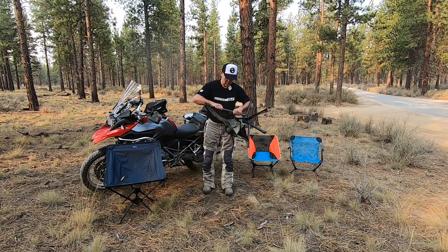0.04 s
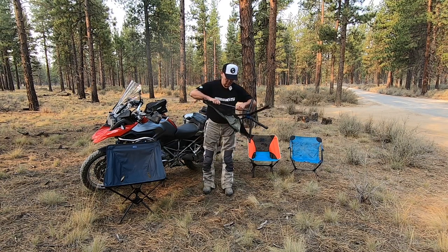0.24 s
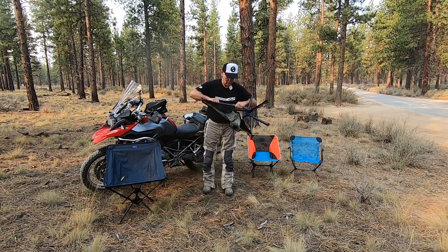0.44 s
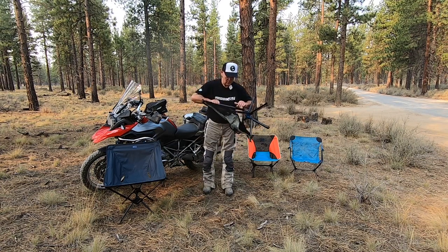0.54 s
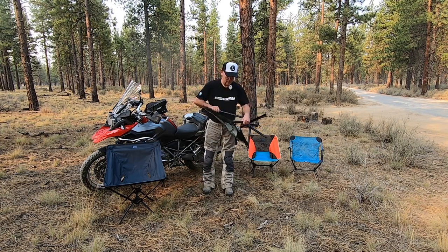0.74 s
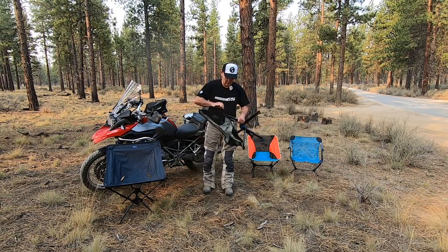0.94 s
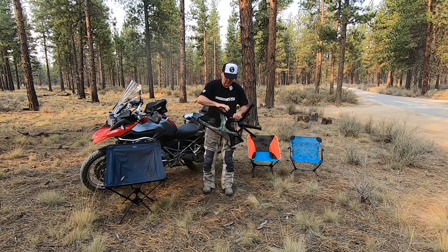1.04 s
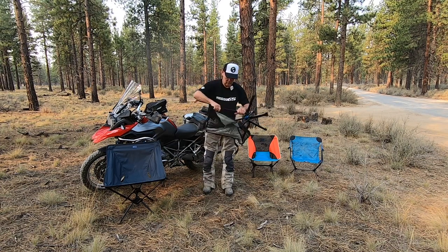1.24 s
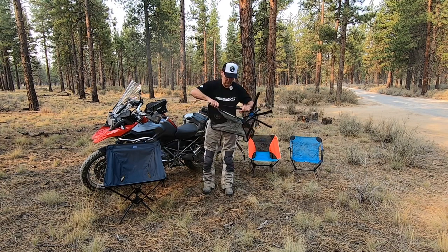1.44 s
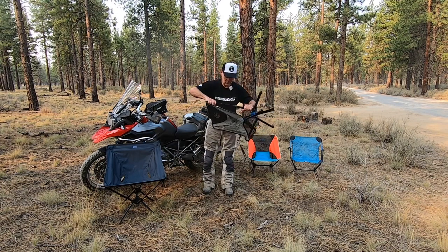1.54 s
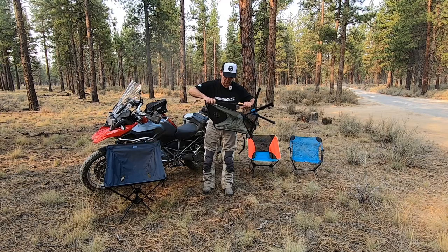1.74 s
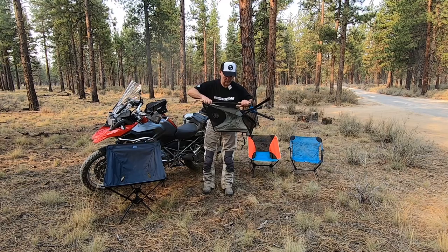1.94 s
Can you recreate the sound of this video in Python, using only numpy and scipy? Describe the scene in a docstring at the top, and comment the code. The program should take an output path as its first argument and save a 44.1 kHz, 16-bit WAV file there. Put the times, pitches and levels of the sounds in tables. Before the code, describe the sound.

Stiff camp chair fabric crackles and slides while frame poles click sharply into place in a quiet forest.

```python
"""In a nearly silent forest, a folding camp chair is opened by hand, close to the microphone.
Stiff nylon rustles and crackles as uneven slips over hiss; friction sounds a hollow sliding pole.
Small ticks and cloth-wrapped knocks are short bursts with rings; the corded poles snap into their hub
as cracks, decaying modes and a low push, hard enough to overload the recorder.
The sound is almost mono: a faint diffuse tail lies in the middle, a very faint signal at the sides."""
import sys
import numpy as np
from scipy import signal
from scipy.fft import rfft, irfft, next_fast_len
from scipy.io import wavfile
from scipy.ndimage import map_coordinates

SR = 44100
rng = np.random.default_rng(int(sys.argv[2]) if len(sys.argv) > 2 else 0)


def wrap_up_sound(samples):
    """Save the sound to the file named by the first command line argument, as 16-bit audio."""
    columns = np.atleast_2d(samples).T
    # keep every value between -1 and 1, then stretch to whole-number steps
    tamed = np.clip(columns, -1, 1)
    steps = np.round(tamed * 32767).astype(np.int16)
    wavfile.write(sys.argv[1], SR, steps)


N = 88200  # samples: two seconds
BLOW_LEN = SR // 4  # samples given to each blow

# spectrum of rubbed nylon: (frequency [Hz], level [dB])
NYLON_SPECTRUM = [(30, -14), (120, -1), (300, -5), (600, -1), (1100, 0), (1600, -4), (2400, -2),
                  (3100, -4.5), (4000, -3.5), (5500, -8), (8000, -13), (12000, -16), (16000, -20.5)]

# fine friction of cloth: slips [1/s], spread of their size [dB], their share of the power [0-1]
CREASES_PER_S, CREASE_SPREAD_DB, CREASE_SHARE = 2500, 3.5, 0.42
CRINKLE_SPREAD_DB = 3.5  # size spread of the sparser crinkles and catches
TREBLE_HZ = 5000  # treble lifts act above about here
ATTACK_S = 0.00013  # time constant of the rise of a blow
RING_PHASE_NOISE = 0.45  # unsteadiness of a ringing mode [rad]
SCATTER_DB, WIDTH_DB = -34.5, -48.5  # level of the faint diffuse tail in mid; of the very faint side signal
AIR_DB, AIR_WIDTH_DB = -50, -30.5  # rms of the air; its side relative to its mid
CLIP_TOP, TOP_HZ = 1.0, 16000  # overload ceiling [full scale = 1] and band limit


def amp(db):
    """Decibels to gain."""
    return 10 ** (np.asarray(db) / 20)


def unit(x):
    """Scale to rms 1."""
    return x / np.sqrt(np.mean(x ** 2) + 1e-20)


def along(points, hz):
    """Interpolate (frequency [Hz], value) points on a log frequency axis."""
    f, v = np.transpose(points)
    return np.interp(np.log(hz + 1), np.log(f + 1), v)


def curves(rows):
    """One value per sample for each column after the time."""
    s, *columns = np.transpose(rows)
    return [np.interp(np.arange(N) / SR, s, column) for column in columns]


def wobble(rate, size=N):
    """A smooth random curve with the given number of knots a second."""
    knots = rng.standard_normal(4096)
    return map_coordinates(knots, [np.arange(size) * rate / SR], mode="wrap")


def filtered(x, response):
    """Multiply the spectrum of x by a response of frequency."""
    n = x.shape[-1]
    padded = next_fast_len(n + 8192)
    gain = response(np.fft.rfftfreq(padded, 1 / SR))
    return irfft(rfft(x, padded) * gain, padded)[..., :n]


def coloured(x, spectrum):
    """Filter x by the given spectrum and scale it to rms 1."""
    return unit(filtered(x, lambda hz: amp(along(spectrum, hz))))


def lifted(x, lift_db):
    """Raise or lower the treble of x."""
    treble = filtered(x, lambda hz: hz ** 4 / (hz ** 4 + TREBLE_HZ ** 4))
    return x + (amp(lift_db) - 1) * treble


def add(track, s, x):
    """Mix x into the track at time s."""
    i = max(round(s * SR), 0)
    track[i:i + len(x)] += x[:max(N - i, 0)]


def decay(t60):
    """Envelope of a blow: quick rise, exponential fall by 60 dB in t60 seconds."""
    t = np.arange(BLOW_LEN) / SR
    return (1 - np.exp(-t / ATTACK_S)) * np.exp(-np.log(1000) * t / t60)


def burst(spectrum, t60, lift_db=0):
    """A blow without pitch: coloured noise that dies away."""
    noise = coloured(rng.standard_normal(BLOW_LEN), spectrum)
    return lifted(noise, lift_db) * decay(t60)


def ring(modes):
    """Struck solid: decaying modes, each at a random phase that wavers slightly."""
    t = np.arange(BLOW_LEN) / SR
    total = np.zeros(BLOW_LEN)
    for hz, db, t60 in modes:
        phase = 2 * np.pi * (hz * t + rng.random())
        waver = RING_PHASE_NOISE * wobble(210, size=len(t))
        total += amp(db) * decay(t60) * np.sin(phase + waver)
    return total


def friction(rate, spread_db, share):
    """Rubbing: tiny random slips of uneven size over a smooth hiss."""
    happens = rng.random(N) < rate / SR
    size_db = spread_db * np.clip(rng.standard_normal(N), -2, 2)
    slips = happens * rng.choice([-1, 1], N) * amp(size_db)
    share = np.clip(share, 0, 1)
    return np.sqrt(share) * unit(slips) + np.sqrt(1 - share) * rng.standard_normal(N)


def air():
    """Faint low background of the still forest: steady coloured noise."""
    # spectrum of the place: (frequency [Hz], level [dB])
    air_spectrum = [(25, -28), (50, -10), (80, 7.5), (125, 2.5), (200, -13), (500, -24.5), (1500, -25.5),
                    (5000, -42.5), (16000, -45.5)]
    return amp(AIR_DB) * coloured(rng.standard_normal(N), air_spectrum)


def fabric():
    """Handled nylon creases and rubs with sparser crinkles, and the seat cloth gives dull flaps."""
    # course of the handling: (time [s], level [dB], treble lift [dB])
    handling = [(0, -34, -7), (.1, -37, -3.5), (.148, -27, -4.5), (.18, -37.5, 1), (.212, -36, -4.5),
                (.225, -65, -33.5), (.33, -105, -11), (.7, -42, -30), (.9, -56, 23.5), (1.06, -46, 3.5),
                (1.16, -26.5, -6.5), (1.23, -36, 3.5), (1.35, -28, -8), (1.385, -43.5, 1),
                (1.415, -37.5, -4.5), (1.45, -35, 1), (1.5, -32, 0), (1.514, -48.5, 2), (1.63, -73, 19),
                (1.74, -52, -3.5), (1.82, -61.5, 3.5), (1.91, -53.5, 3), (1.943, -45.5, 7), (1.955, -41, 8),
                (1.98, -29.5, 4), (2, -36.5, 10.5)]
    # dull flaps of the seat: (time of peak [s], level [dB], standard deviation of the swell [s])
    flaps = [(0.153, -30.5, 0.0094), (0.605, -44.5, 0.032), (0.672, -37.5, 0.035), (1.091, -35, 0.017),
             (1.263, -33, 0.02), (1.733, -46.5, 0.013), (1.912, -45, 0.0039), (1.988, -62, 0.0055)]
    # spectrum of a flap: (frequency [Hz], level [dB])
    flap_spectrum = [(30, -67), (100, 0), (250, 0), (600, -1.5), (1500, -18), (5000, -36.5)]
    crinkles_per_s, crinkle_db, flutter_db = 150, -7.5, 2.5

    level_db, lift_db = curves(handling)
    creases = friction(CREASES_PER_S, CREASE_SPREAD_DB, CREASE_SHARE)
    crinkles = amp(crinkle_db) * friction(crinkles_per_s, CRINKLE_SPREAD_DB, 0.86)
    rustle = lifted(coloured(creases + crinkles, NYLON_SPECTRUM), lift_db)
    rustle = rustle * amp(level_db + flutter_db * wobble(69.89))
    t = np.arange(N) / SR
    swells = sum(amp(db) * np.exp(-.5 * ((t - s) / spread) ** 2) for s, db, spread in flaps)
    return rustle + swells * coloured(rng.standard_normal(N), flap_spectrum)


def sliding_pole():
    """Fine friction sounds the resonances of the hollow pole, which catches on the weave."""
    # course of the slide along the fabric: (time [s], level [dB])
    slide = [(0, -50), (.22, -45.5), (.28, -50.5), (.36, -51.5), (.52, -46.5), (.62, -38.5), (.72, -33),
             (.79, -28), (.87, -28.5), (.96, -33.5), (1.05, -36.5), (1.15, -35.5), (1.3, -35.5),
             (1.42, -46), (1.52, -41.5), (1.62, -61), (2, -79.5)]
    # hollow resonances: (frequency [Hz], distance from peak to half gain [Hz], level [dB])
    bore = [(462, 47, 1), (746, 106, -0.5), (1350, 300, -38), (1900, 260, -11), (2650, 250, -32.5),
            (3930, 400, -11), (5860, 2200, -20.5)]
    # spectrum of the scrape beneath them: (frequency [Hz], level [dB])
    scrape = [(40, -27), (250, -10), (600, -6.5), (1200, -18.5), (5000, -21.5), (8000, -26), (11000, -29.5),
              (16000, -35.5)]
    catches_per_s, catch_db, flutter_db = 130, -13, 2.0

    def body(f):
        """Scrape and resonances, added in power."""
        power = amp(along(scrape, f)) ** 2
        for hz, width, db in bore:
            power = power + (amp(db) / (1 + ((f - hz) / width) ** 2)) ** 2
        return np.sqrt(power)

    level_db, = curves(slide)
    glide = unit(filtered(friction(CREASES_PER_S, CREASE_SPREAD_DB, CREASE_SHARE), body))
    catches = coloured(friction(catches_per_s, CRINKLE_SPREAD_DB, 0.88), NYLON_SPECTRUM)
    return (glide + amp(catch_db) * catches) * amp(level_db + flutter_db * wobble(39.9))


def ticks():
    """Buckles and creases touch lightly: a very short ring and a scuff, with the bass removed."""
    # small dry contacts: (time [s], level [dB], scuff t60 [s], treble lift [dB])
    contacts = [(.0045, -19, 0.0056, 3), (1.1135, -20, 0.008, -6), (1.156, -19, .008, -12),
                (1.175, -17, 0.004, -18), (1.1955, -19, 0.004, -5), (1.3083, -13, .005, -20),
                (1.341, -19, .006, -12), (1.349, -18, 0.009, -14), (1.3555, -19, .006, -8),
                (1.4342, -17, .006, -9), (1.732, -39, 0.012, 10), (1.823, -53, 0.003, 10),
                (1.9488, -11, 0.004, 2.5)]
    # modes of a tick: (frequency [Hz], level [dB], t60 [s])
    tick_modes = [(1600, 0, .0035), (2400, -4, .0035), (4200, 2, .0055), (7000, 0, .002)]
    low_hz = 895  # bass is cut below about here

    out = np.zeros(N)
    for s, db, t60, lift_db in contacts:
        contact = ring(tick_modes) + burst(NYLON_SPECTRUM, t60)
        add(out, s, amp(db) * lifted(contact, lift_db))
    return filtered(out, lambda hz: hz ** 4 / (hz ** 4 + low_hz ** 4))


def knocks():
    """Poles bump through the cloth as noise with a muffled ring; the bundle thuds in the hands."""
    # blunt knocks of wrapped poles: (time [s], level [dB], t60 [s], ring of the pole [dB])
    blunt_knocks = [(0.059, -27.5, 0.015, -9), (0.163, -33, 0.0089, -20), (0.713, -25.5, 0.0094, -10),
                    (0.744, -26.5, 0.018, 1.5), (0.767, -28.5, 0.0053, 3), (0.7885, -22.5, 0.015, 8.5),
                    (0.793, -30.5, 0.008, 11), (1.434, -23.5, 0.022, -28), (1.5515, -31.5, 0.041, -25),
                    (1.689, -38.5, 0.011, -26), (1.718, -43.5, 0.017, -23), (1.733, -34, 0.031, -35),
                    (1.897, -39.5, 0.014, -20), (1.907, -34, 0.018, -27)]
    # spectrum of a knock: (frequency [Hz], level [dB])
    knock_spectrum = [(60, -20.5), (400, -5.5), (1000, -7.5), (1800, -3.5), (2600, -14), (5000, -18.5),
                      (16000, -39)]
    # modes of a wrapped pole: (frequency [Hz], level [dB], t60 [s])
    wrapped_modes = [(1163, -2, .022), (2660, -3.5, 0.038), (3110, -8.5, 0.035)]
    # soft thuds in the hands: (time [s], level [dB], t60 [s])
    bumps = [(0.167, -33, 0.047), (1.079, -31.5, 0.043), (1.908, -48, 0.019)]
    # spectrum of a thud: (frequency [Hz], level [dB])
    bump_spectrum = [(30, -20.5), (100, 3), (230, 2), (450, -14.5), (1500, -29), (5000, -68)]

    out = np.zeros(N)
    for s, db, t60, ring_db in blunt_knocks:
        knock = burst(knock_spectrum, t60) + amp(ring_db) * ring(wrapped_modes)
        add(out, s, amp(db) * knock)
    for s, db, t60 in bumps:
        add(out, s, amp(db) * burst(bump_spectrum, t60))
    return out


def frame():
    """Poles hitting home: each contact cracks, rings the parts of the frame and gives one low push."""
    # contacts: (time [s], crack [dB], crack t60 [s], brightness limit [Hz],
    #            tube [dB], hub [dB], leg [dB], socket [dB], thump [dB])
    snaps = [(0.2288, -20.5, 0.031, 15900, -49, -43, -63, -41, -32),
             (0.2336, -1.5, 0.017, 21000, -31, -1.5, -58, -40, -7),
             (0.2358, 0, 0.013, 21100, -26.5, -23.5, -56, -21.5, -23.5),
             (0.842, -18, 0.006, 6000, -40, -48, -19.5, -41, -53),
             (0.8449, -7.5, 0.019, 9300, -30, -51, -11.5, -25, -47),
             (.8497, -9, .011, 7500, -42, -32, -25, -35, -40),
             (1.519, -23.5, 0.014, 12200, -35.5, -48, -55.5, -37.5, -28),
             (1.521, 4.5, 0.017, 20800, -8, -27.5, -51, -12, -11),
             (1.5564, -28.5, 0.04, 21100, -53.5, -50, -66, -45, -43.5),
             (1.5635, -6, 0.021, 21100, -26.5, -54.5, -54, -8.5, -19)]
    # spectrum of the crack: (frequency [Hz], level [dB])
    crack_spectrum = [(40, -10), (350, -14), (900, -8), (1700, -1), (2100, -3), (3300, 1), (5000, -2),
                      (6400, -4), (7600, -2), (10000, 0), (12000, -1), (16000, -5)]
    # modes of the tube: (frequency [Hz], level [dB], t60 [s])
    tube = [(1760, -7, .016), (2610, -14, .045), (2735, -3, .055), (3300, -1, .016), (7000, -10, .024),
            (9545, -7, .052), (9830, 0, .02), (10490, 0, .016), (11370, -2, .016), (12400, -2, .016)]
    # modes of the plastic hub: (frequency [Hz], level [dB], t60 [s])
    hub = [(856, -26, .13), (1300, -17, .06), (1800, -5, .016), (2110, 2, .019), (2590, -2, .025),
           (3600, -6, .018), (4005, 2, .018), (5210, -1, .018), (6500, -6, .014), (10490, -4, .016),
           (11380, -3, .018)]
    # modes of a leg: (frequency [Hz], level [dB], t60 [s])
    leg = [(1893, -2, .11), (2990, 0, .05), (3850, -5, .022), (6745, -11, .05), (7890, 4, .02),
           (9566, -6, .03)]
    # modes of a pole socket: (frequency [Hz], level [dB], t60 [s])
    socket = [(1244, -30, .12), (1460, -4, .016), (2745, -17, .055), (3160, -19, .045), (4850, -2, .016),
              (5950, -4, .014), (7550, 1, .016), (9520, -4, .033), (11900, 1, .016), (14100, -3, .014)]
    thump_s = .0017  # time constant of the push

    out = np.zeros(N)
    u = np.arange(BLOW_LEN) / SR / thump_s
    push = (1 - u) * np.exp(-u)
    for s, crack_db, t60, bright_hz, *part_db, thump_db in snaps:
        blow = amp(crack_db) * burst(crack_spectrum, t60)
        for db, modes in zip(part_db, (tube, hub, leg, socket)):
            blow = blow + amp(db) * ring(modes)
        blow = filtered(blow, lambda hz: (1 + (hz / bright_hz) ** 8) ** -.5)
        add(out, s, blow + amp(thump_db) * push)
    return out


def scattered(x):
    """A short diffuse tail, as of ground and trunks: x through noise that decays by frequency."""
    # decay of the tail: (frequency [Hz], t60 [s])
    scatter_t60 = [(100, 0.13), (1000, 0.14), (4000, 0.16), (14000, 0.18)]
    hz, t, z = signal.stft(rng.standard_normal(SR // 3), SR, nperseg=256)
    fade = np.exp(-np.log(1000) * t / along(scatter_t60, hz)[:, None])
    tail = signal.istft(z * fade, SR, nperseg=256)[1]
    return signal.fftconvolve(x, tail / np.linalg.norm(tail))[:N]


def scene():
    """The chair in the centre with a faint diffuse tail, over quiet forest air."""
    chair = fabric() + sliding_pole() + ticks() + knocks() + frame()
    mid = chair + amp(SCATTER_DB) * scattered(chair) + air()
    side = amp(WIDTH_DB) * scattered(chair) + amp(AIR_WIDTH_DB) * air()
    return np.array([mid + side, mid - side])


def record(dry):
    """Recorder overload rounds off the loudest peaks; a steep low-pass then limits the band."""
    clipped = dry / (1 + np.abs(dry / CLIP_TOP) ** 6) ** (1 / 6)
    return filtered(clipped, lambda hz: 1 / (1 + (hz / TOP_HZ) ** 200))


dry = scene()
out = record(dry)
wrap_up_sound(out)
```